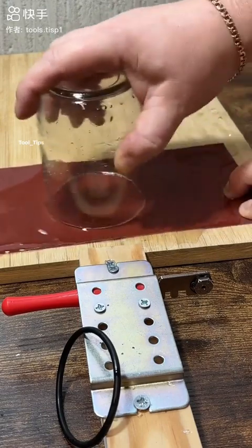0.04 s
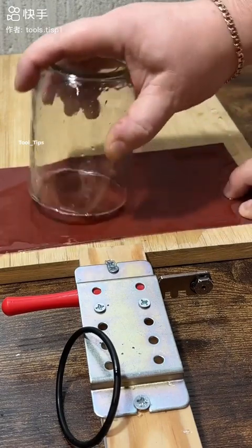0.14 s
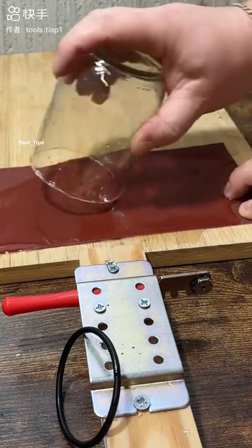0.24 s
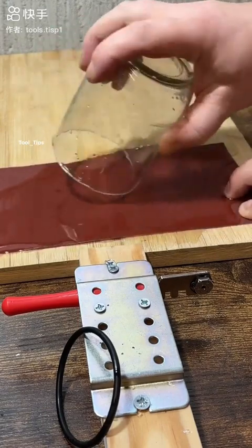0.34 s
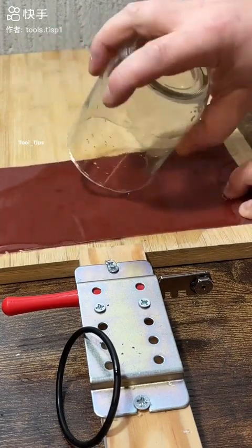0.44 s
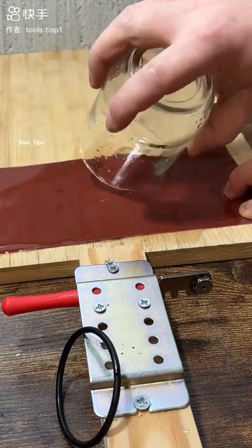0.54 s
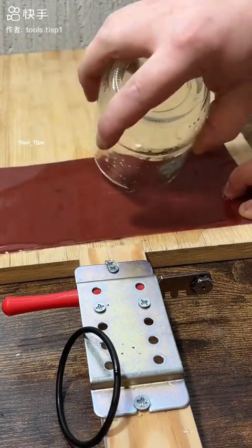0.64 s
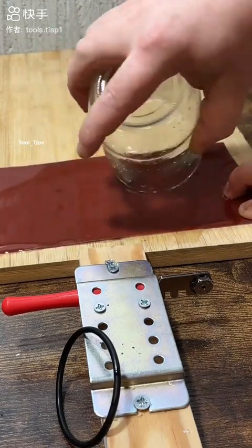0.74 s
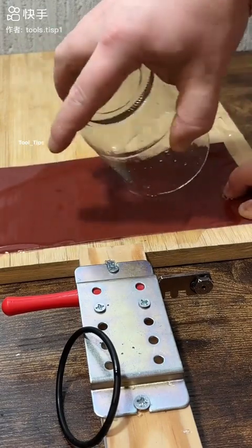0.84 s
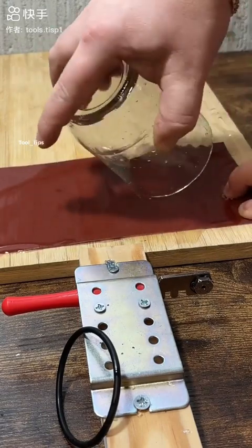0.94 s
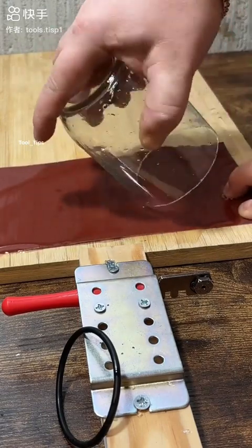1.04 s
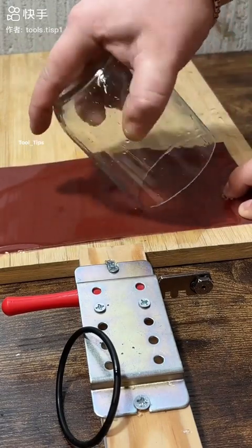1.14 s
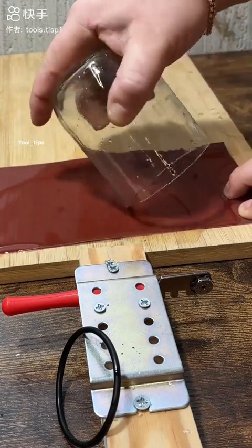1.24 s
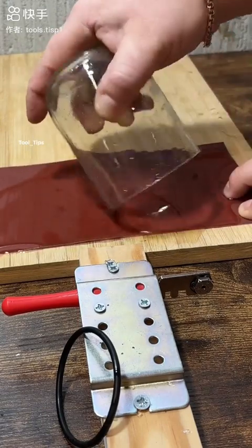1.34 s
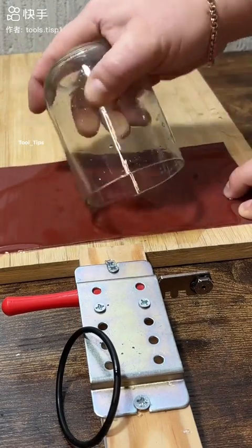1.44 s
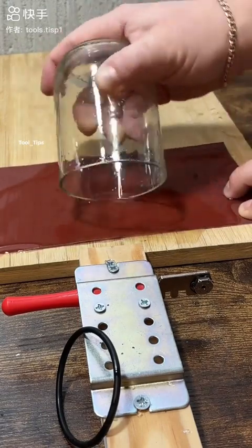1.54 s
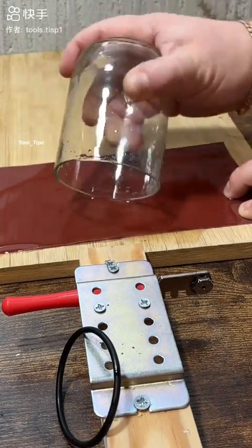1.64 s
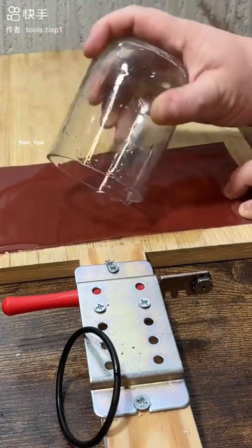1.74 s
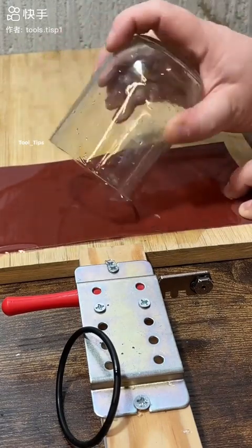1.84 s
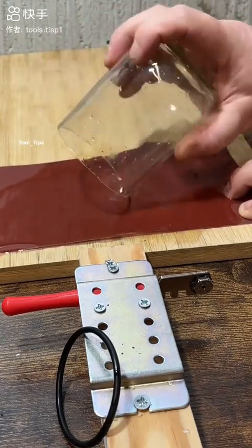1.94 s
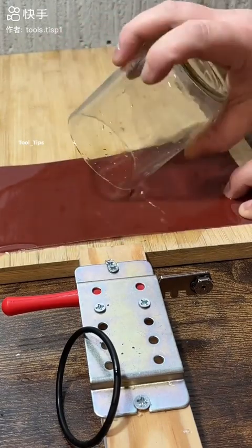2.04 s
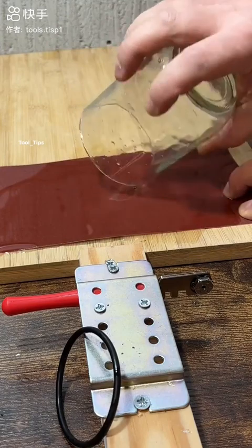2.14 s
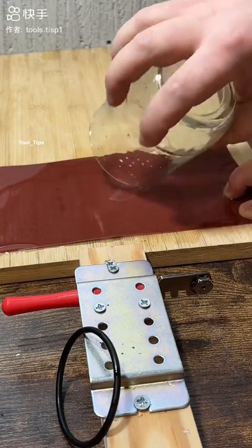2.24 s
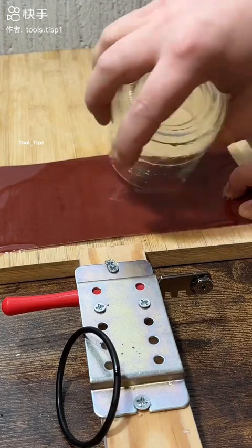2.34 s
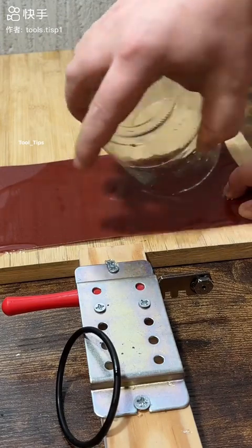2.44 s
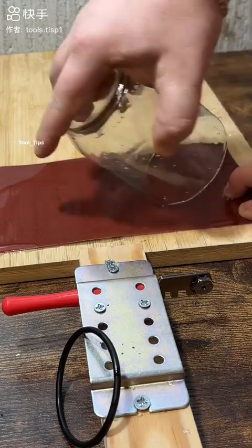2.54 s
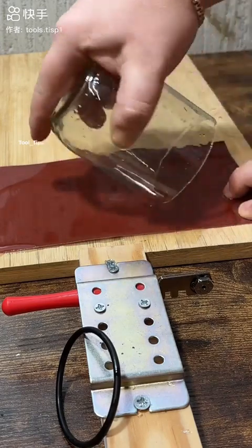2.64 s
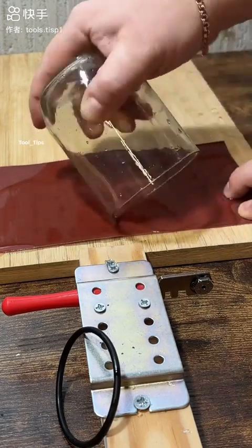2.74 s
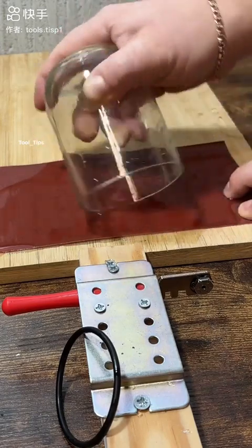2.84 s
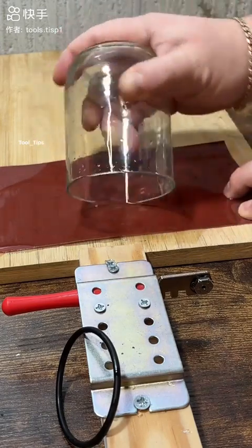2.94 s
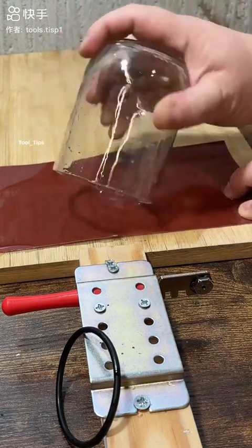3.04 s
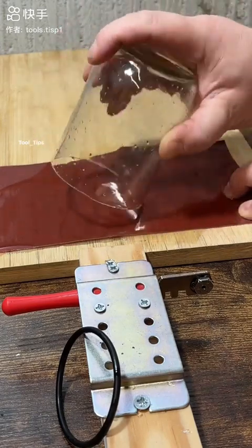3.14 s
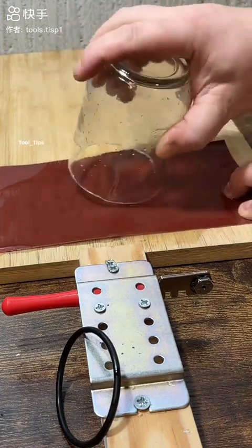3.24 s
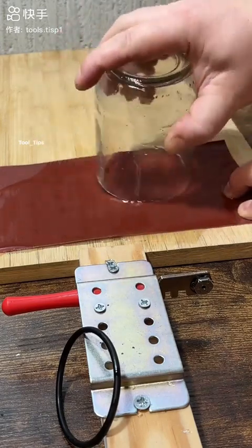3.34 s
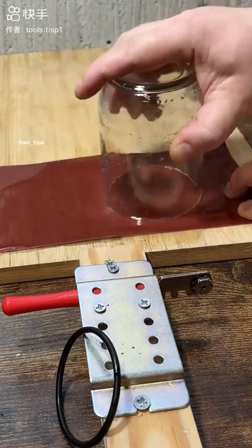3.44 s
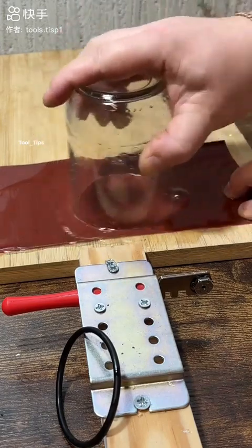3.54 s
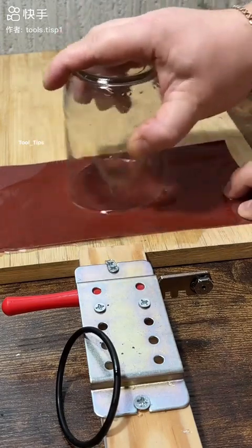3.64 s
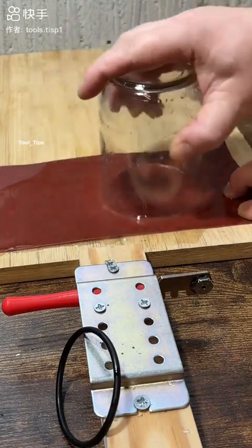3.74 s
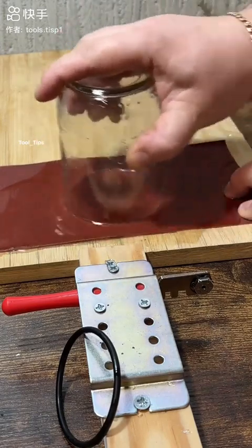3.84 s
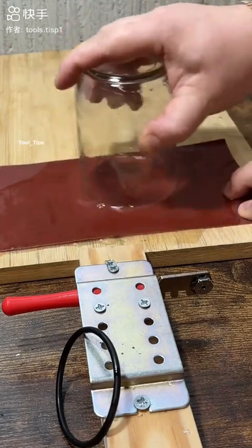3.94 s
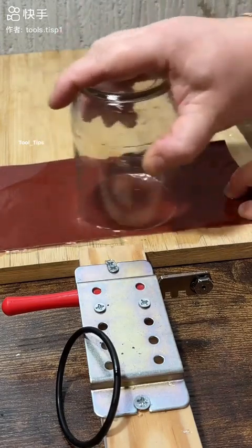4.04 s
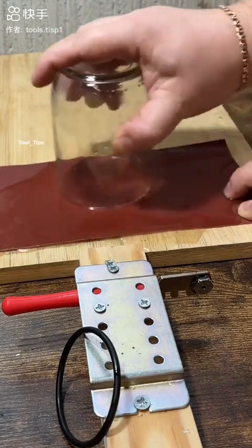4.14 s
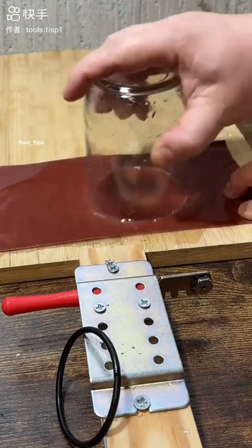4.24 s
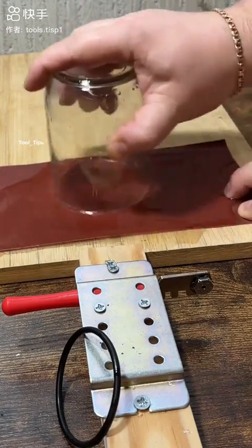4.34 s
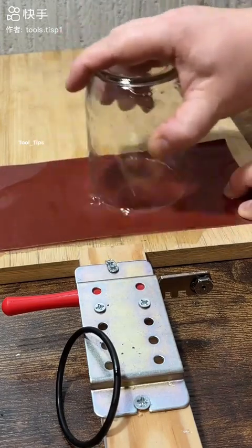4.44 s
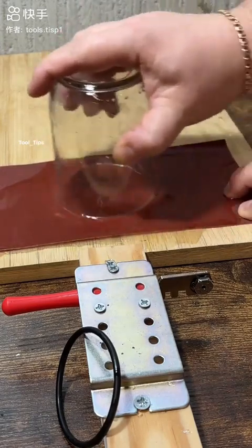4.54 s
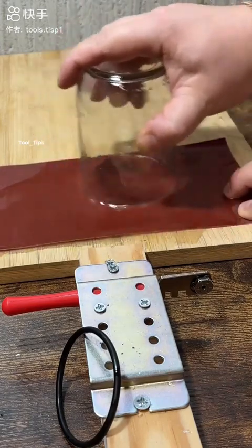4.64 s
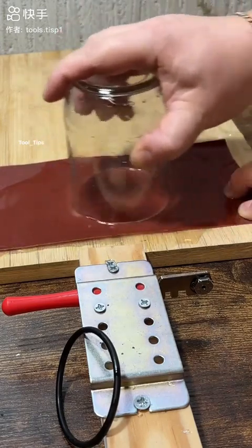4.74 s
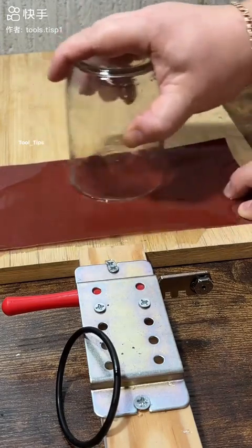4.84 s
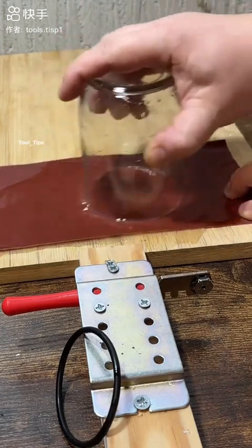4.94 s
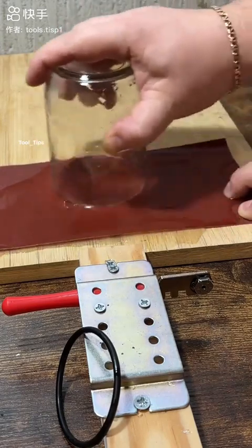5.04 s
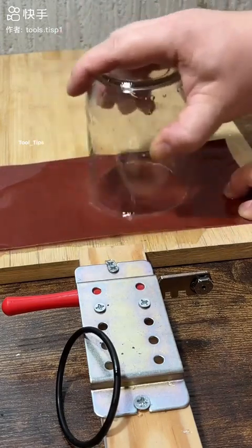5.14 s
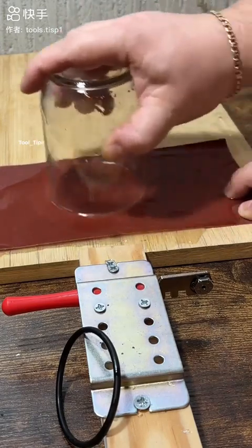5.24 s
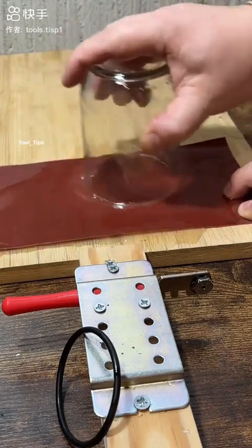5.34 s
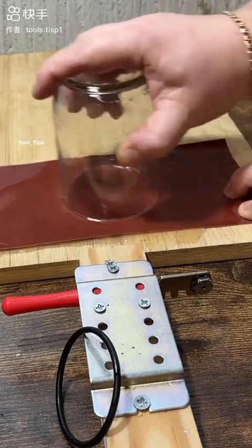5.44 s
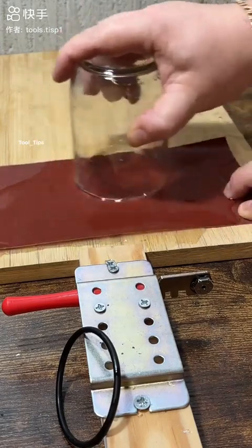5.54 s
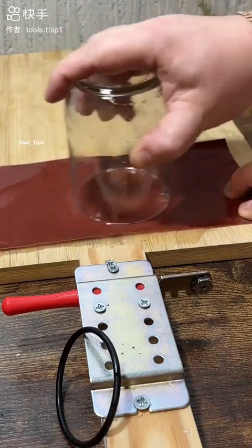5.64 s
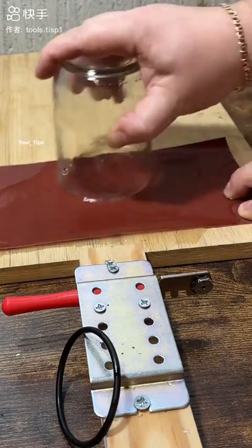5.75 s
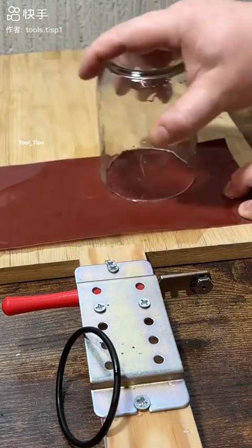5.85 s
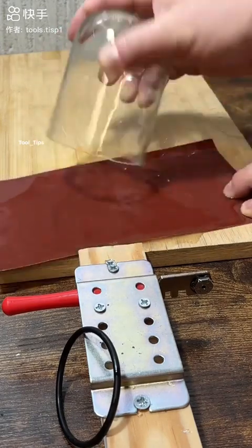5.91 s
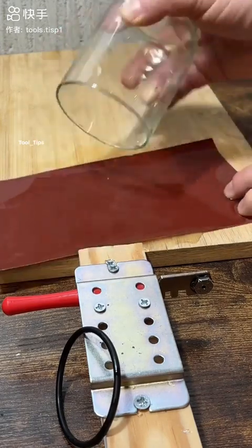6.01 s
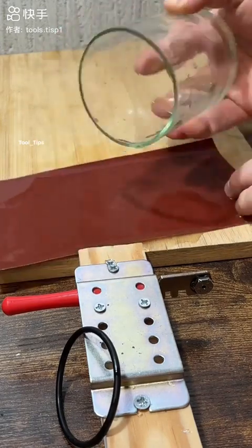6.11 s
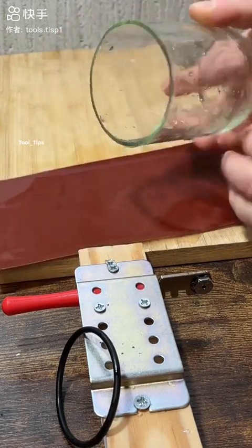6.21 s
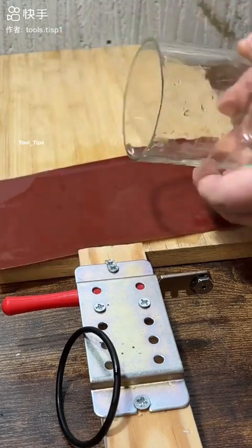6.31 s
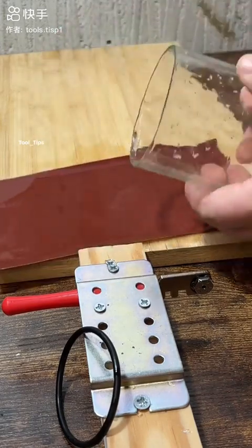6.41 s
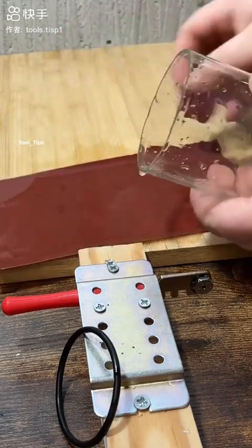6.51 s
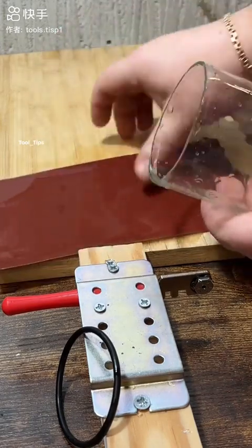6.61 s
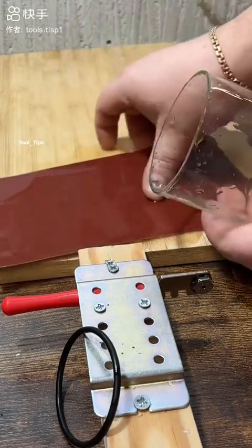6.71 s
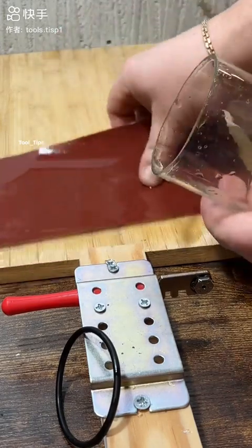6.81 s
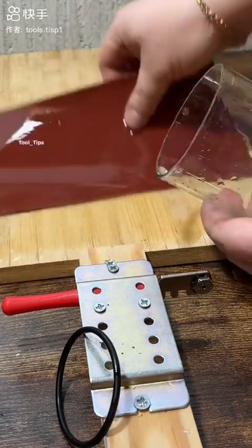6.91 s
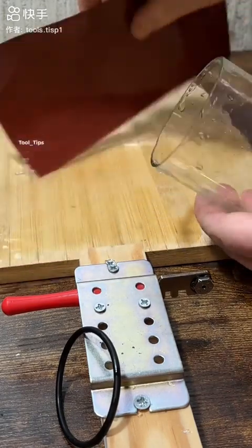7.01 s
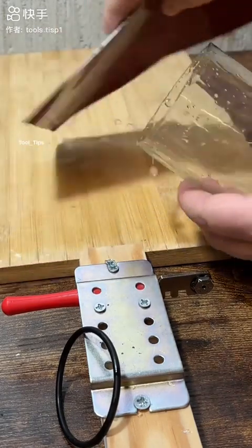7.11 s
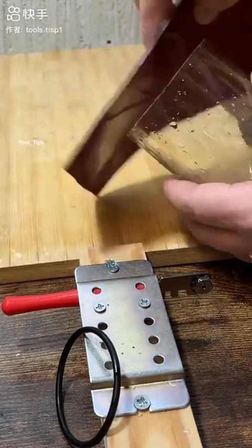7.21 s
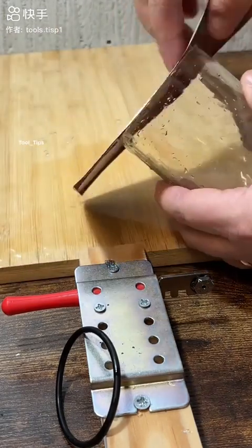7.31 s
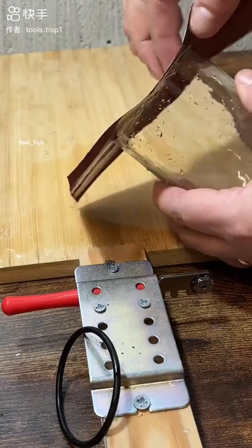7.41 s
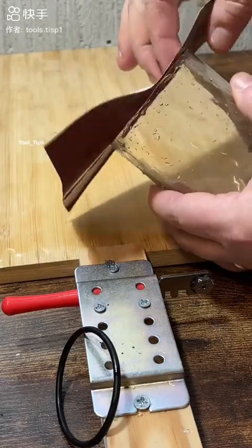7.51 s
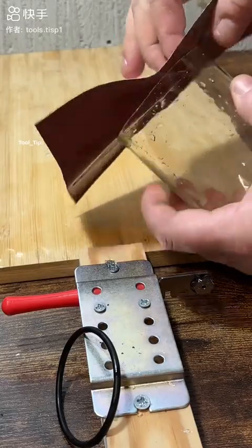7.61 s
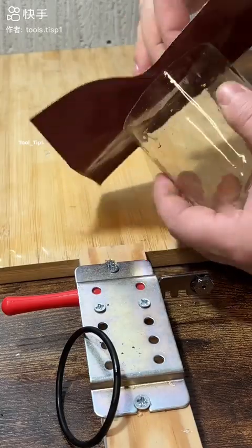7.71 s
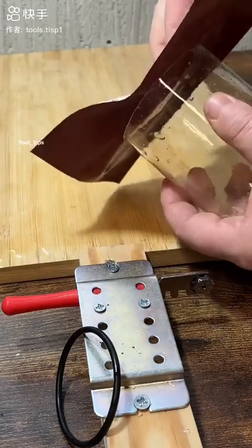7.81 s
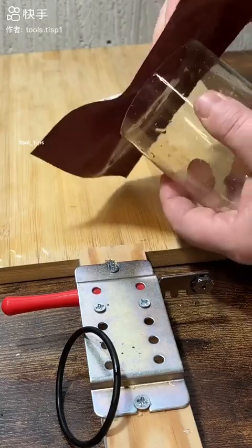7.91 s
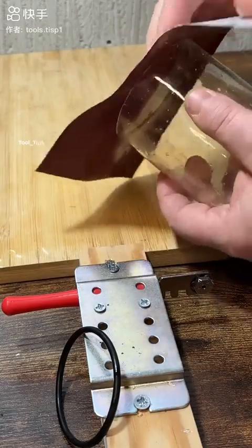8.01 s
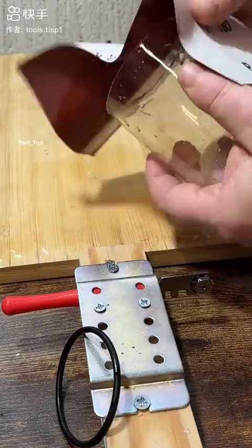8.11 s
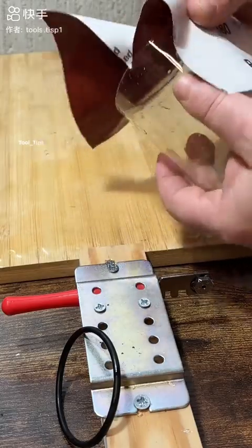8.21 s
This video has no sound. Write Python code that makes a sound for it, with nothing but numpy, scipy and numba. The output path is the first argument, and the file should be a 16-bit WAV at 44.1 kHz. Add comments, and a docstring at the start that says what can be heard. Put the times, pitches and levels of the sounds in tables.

```python
"""Grinding a jar rim on wet sandpaper

A glass jar's cut rim is ground over a wooden board, close by in a small workshop. Rolled on its tilted
edge, the jagged parts rasp; rubbed flat in quick circles, the glass sings and stick-slip makes it squeal.
The grit also shakes the board and the air in the jar. The jar is lifted, and the sheet is picked up
and wiped over the rim by hand."""
import sys
import numpy as np
from scipy import signal
from scipy.fft import rfft, irfft, next_fast_len
from scipy.io import wavfile
from scipy.ndimage import uniform_filter1d
from numba import njit

SR = 44100
rng = np.random.default_rng(int(sys.argv[2]) if len(sys.argv) > 2 else 0)


def int16_out(signal):
    """Quantize to a 16-bit WAV file."""
    q = np.round(np.clip(np.atleast_2d(signal).T, -1, 1) * 32767)
    wavfile.write(sys.argv[1], SR, q.astype(np.int16))


N = 364707

# jar wall bending modes (frequency [Hz], width [Hz], level [dB], rise at full tilt [ratio], grip [dB])
GLASS_MODES = [(1925, 45, -0.5, .04, 3), (5163, 36.6, -2, 0.017, 2.2), (5190, 58, -7.5, 0.02, 1.5),
               (8860, 260, -10.5, .01, 1.3), (9320, 200, -10.5, .01, 2.8)]
# board modes (frequency [Hz], t60 [s], level [dB])
BOARD_MODES = [(81, 0.17, -14.5), (159, 0.16, -12), (233, 0.088, -1.5), (297, 0.098, -4), (349, 0.059, 1),
               (377.5, 0.053, -8.5), (513, .06, -4.5), (604, 0.07, -11.5)]

TURN_S = 1.58  # one roll round the tilted edge
CIRCLE_S, CIRCLE_PEAK_S = 0.2269, 4.02  # flat circles: period, a fastest moment


def grinding():
    """Grit under the rim scrapes and shakes the glass, the air in the jar and the board."""
    # lean of the jar (time [s], tilt [0 flat, 1 on edge])
    lean = [(0, 0.062), (.065, 0.16), (.16, 0.47), (.6, 0.62), (1.4, 0.7), (2.2, 0.8), (2.95, 0.9),
            (3.17, 0.43), (3.32, .22), (3.365, 0.024), (5.8, 0.028), (5.86, 0.21)]
    # scrape spectrum (frequency [Hz], level [dB])
    scrape_spectrum = [(500, -18.5), (1100, -0.5), (1450, 2.5), (2500, 1.5), (3300, 0.5), (4450, 4.5),
                       (4800, -0.5), (5700, 2), (6350, -1), (6600, -6.5), (8450, -6), (8750, 0.5),
                       (10300, 0.5), (13000, 2.5), (16000, 0.5)]
    # resonances of the tilted jar (frequency [Hz], width [Hz], level [dB])
    jar_modes = [(1190, 200, 1.5), (1460, 260, 13.5), (2040, 200, 0), (3470, 150, -1.5), (3726, 66, -2),
                 (4460, 93, 16), (5370, 67, -25.5), (5700, 170, -29.5), (9460, 200, -1), (12600, 750, 3)]
    tilt = np.clip(curves(lean)[0], 0, 1)
    force = rim_force(tilt)
    board_db, wall_db, low_db, high_db = drives_db(tilt, force)
    grains = grit(rate_hz=14000, spread_db=2, judder_db=2.5, judder_hz=401.6)
    scrape = colour(grit(rate_hz=12000, spread_db=3, judder_db=1.46, judder_hz=503), scrape_spectrum)
    # on edge the jar is open below: the scrape turns hollow
    scrape -= tilt * (0.53 * resonate(scrape, 4730, 330) + 0.42 * resonate(scrape, 1720, 240))
    hollow = unit(sum(undb(db) * resonate(grains, hz, width_hz) for hz, width_hz, db in jar_modes))
    sound = undb(0.06 - 2 * tilt) * scrape + undb(-10) * tilt * hollow
    sound += wall_voice(grains, tilt, wall_db)
    sound += jar_air(grains, tilt)
    sound += undb(board_db) * board_rumble(tilt)
    return force * sound + glass_ring(force * grains, tilt, low_db, high_db)


def rim_force(tilt):
    """Steady pressure, swinging with each flat circle until the lift, plus rasps."""
    # rim pressure on the paper (time [s], level [dB])
    pressure = [(0, -43.5), (0.125, -66), (0.19, -54), (0.24, -33.5), (0.42, -40), (0.65, -41.5),
                (0.7, -56), (0.92, -68), (1.0, -58.5), (1.66, -57), (1.73, -33.5), (2.0, -33), (2.28, -37),
                (2.36, -47.5), (2.55, -53), (2.88, -44), (2.99, -32), (3.11, -34.3), (3.22, -39),
                (4.0, -35.2), (5.8, -35.5)]
    # jagged parts dragging through the grit (centre [s], length [s], level [dB])
    rasps = [(0.089, 0.072, -39.5), (0.159, 0.072, -36.5), (0.216, 0.039, -36.5), (0.723, 0.051, -43),
             (0.79, 0.05, -46.5), (0.872, 0.068, -48), (0.964, 0.073, -37), (1.056, 0.058, -39.5),
             (1.158, 0.048, -40), (1.223, 0.072, -38), (1.293, 0.059, -35.5), (1.355, 0.066, -34.5),
             (1.389, 0.016, -39), (1.415, 0.066, -34.5), (1.475, 0.058, -34.5), (1.539, 0.067, -35.5),
             (1.599, 0.094, -35.5), (1.676, 0.074, -29.5), (2.353, 0.035, -37), (2.409, 0.088, -36),
             (2.475, 0.05, -38.5), (2.609, 0.047, -40), (2.644, 0.048, -34.5), (2.705, 0.056, -32),
             (2.766, 0.056, -31), (2.83, 0.055, -30), (2.887, 0.042, -32.5), (3.155, 0.045, -37),
             (3.215, 0.035, -38), (5.858, 0.033, -40.5)]
    lift_s, lift_db_per_s = 5.8, 476
    circling_db = 2 * (1 - on_edge(tilt)) * cycle(CIRCLE_S, CIRCLE_PEAK_S)
    lift_db = lift_db_per_s * np.clip(clock() - lift_s, 0, 1)
    return effort(curves(pressure)[0] + circling_db - lift_db, rasps, skew=0.88, bite=1.36)


def drives_db(tilt, force):
    """Drive of the board, the wall's broad voice, and the low and high glass modes."""
    firm_db, touch_s = -35.5, 0.19
    edge = on_edge(tilt)
    flat = 1 - edge
    circle = cycle(CIRCLE_S, CIRCLE_PEAK_S)
    board_db = -11.5 * edge + flat * (-14.5 - 2 * circle)
    board_db += 3 * np.sin(np.pi * edge)  # half tilted, an arc of the rim digs in
    # on edge, the contact point passes each mode's antinode in turn
    wall_db = -7.5 + edge * 3 * cycle(TURN_S, peak_s=1.38)
    low_db = edge * (-7 + 4 * cycle(TURN_S, peak_s=0.64)) + flat * (-5.5 - 1.5 * circle)
    high_db = edge * (-6 + 5.5 * cycle(TURN_S, peak_s=1.03)) + flat * (-3 + 2.5 * circle)
    # a light touch damps less, so more rings
    touch_power = uniform_filter1d(force ** 2, int(touch_s * SR))
    touch_db = 10 * np.log10(np.maximum(touch_power, 1e-12))
    light_db = np.minimum(firm_db - touch_db, 16)
    return (board_db + 0.54 * light_db, wall_db + 0.25 * light_db,
            low_db + 0.46 * light_db, high_db + 0.14 * light_db)


def glass_ring(push, tilt, low_db, high_db):
    """The wall rings after each push, higher and more damped on edge."""
    out = np.zeros(N)
    for hz, width_hz, db, rise, grip_db in GLASS_MODES:
        coupling_db = low_db if hz == GLASS_MODES[0][0] else high_db
        pitch_hz = hz * (1 + rise * tilt ** 2 + 0.0044 * walk(40))
        damping_hz = width_hz * (1 + 1.1 * tilt ** 2)
        grip = unit(undb(grip_db * walk(45)))  # the rim bites and slides by turns
        gain = undb(coupling_db + db - 1.505 * tilt) * np.sqrt(SR / (np.pi * damping_hz))
        out += resonate(push * grip * gain, pitch_hz, damping_hz)
    return out


def wall_voice(grains, tilt, wall_db):
    """The wall's broad resonance sinks once a turn while a lower one comes forward."""
    sag = on_edge(tilt) * ((1 + cycle(TURN_S, peak_s=0.8)) / 2) ** 2
    upper = band(grains, hz=3312 - 650 * sag, width_hz=680)
    lower = band(grains, hz=2190, width_hz=330)
    return undb(wall_db) * upper + undb(-8.5) * sag * lower


def jar_air(grains, tilt):
    """The air in the jar rings higher as the gap under the rim opens, loudest at a narrow gap."""
    shut_hz, open_hz, loudest_tilt = 380, 1142, 0.24
    hz = open_hz - (open_hz - shut_hz) * np.exp(-tilt / 0.3)
    leak_hz = 115 + 170 * tilt ** 2  # a wider gap damps more
    ring = band(grains / np.sqrt(leak_hz), hz, leak_hz)
    gap = tilt / loudest_tilt
    return undb(-2) * (gap * np.exp(1 - gap)) ** 1.66 * ring


def board_rumble(tilt):
    """The board rumbles under the grit; its lowest mode drones when the rim lies flat."""
    # rumble spectrum (frequency [Hz], level [dB])
    spectrum = [(35, -24.5), (70, -12.5), (105, -8.5), (150, -7), (240, 4), (370, 0), (560, 5), (850, 0.5),
                (1300, -0.5), (2600, -28)]
    shake = grit(rate_hz=5000, spread_db=5, judder_db=0.5, judder_hz=119.4)
    modes = sum(undb(db) * np.sqrt(t60_s) * resonate(shake, hz, np.log(1000) / np.pi / t60_s)
                for hz, t60_s, db in BOARD_MODES[1:])
    drone = unit(resonate(rng.standard_normal(N), BOARD_MODES[0][0], width_hz=18))
    rumble = colour(grit(rate_hz=5000, spread_db=1.5, judder_db=2, judder_hz=101.6), spectrum)
    return undb(-3.5) * unit(modes) + undb(-2.5) * rumble + undb(-15.5) * (1 - tilt) * drone


def squeals():
    """Stick-slip locks onto one wall mode, swells to a near-pure tone and lets go."""
    # squeals (centre [s], length [s], mode [low/high], level [dB])
    locks = [(0.211, 0.033, "low", -34), (0.324, .04, "low", -35), (3.283, 0.055, "low", -34),
             (3.345, .099, "high", -32.5), (3.75, 0.083, "high", -37), (3.86, 0.066, "low", -35),
             (3.996, .04, "low", -33), (4.017, 0.055, "high", -29), (4.094, 0.056, "low", -31),
             (4.234, 0.093, "high", -28), (4.334, 0.04, "low", -32), (4.456, .039, "low", -17.5),
             (4.481, .06, "high", -28), (4.927, 0.056, "high", -26), (5.142, .04, "low", -31),
             (5.166, 0.14, "high", -34), (5.371, 0.034, "low", -14), (5.38, 0.12, "high", -38),
             (5.613, 0.049, "high", -28.5), (5.747, 0.031, "low", -31)]
    mode_hz = {"low": 1918.4, "high": 5190}
    waver = 2 * np.pi * np.cumsum(0.00407 * walk(150)) / SR
    tones = {mode: np.sqrt(2) * np.sin(hz * (2 * np.pi * clock() + waver))
             for mode, hz in mode_hz.items()}
    return sum(undb(db) * swell(centre_s, length_s, skew=1, bite=1.1) * tones[mode]
               for centre_s, length_s, mode, db in locks)


def bumps():
    """Soft knocks of jar and hand ring the board."""
    # knocks (time [s], peak level [dB])
    knocks = [(3.6, -39.5), (3.996, -43.5), (4.3, -47), (4.447, -35), (4.476, -37), (4.586, -32.5),
              (4.601, -51.5), (4.765, -41), (5.152, -37), (5.796, -32), (5.812, -64), (6.62, -58)]
    t = np.arange(SR // 2) / SR
    ring = sum(undb(db - 60 * t / t60_s) * np.sin(2 * np.pi * hz * t) for hz, t60_s, db in BOARD_MODES)
    ring *= 1 - np.exp(-t / 0.0036)  # each knock builds up over a few milliseconds, light in the deepest bass
    ring /= np.abs(ring).max()
    out = np.zeros(N)
    for time_s, db in knocks:
        start = int(time_s * SR)
        out[start:start + len(t)] += undb(db) * ring
    return out


def wiping():
    """The sheet scrapes the jar's mouth: air and glass ring, wrapped paper rasps like a membrane."""
    # sheet pressure on the rim (time [s], level [dB])
    pressure = [(7.165, -81), (7.19, -47.5), (7.34, -58), (7.41, -48.5), (7.62, -46.5), (7.85, -60.5),
                (8.0, -48.5), (8.07, -24), (8.235, -29.5), (8.268, -46)]
    # short wipes (centre [s], length [s], level [dB])
    wipes = [(7.185, 0.022, -44.5), (7.235, 0.057, -41.5), (7.298, 0.069, -47.5), (7.381, 0.041, -34.5),
             (7.49, 0.041, -30.5), (7.536, 0.09, -31.5), (7.581, 0.034, -38.5), (7.627, 0.054, -32.5),
             (7.753, 0.088, -47.5), (7.835, 0.022, -49.5), (7.908, 0.041, -43.5), (7.942, 0.048, -38.5)]
    # sheet over the mouth (time [s], air resonance [Hz], wrap round the rim [0-1])
    cover = [(7.17, 674, 0.03), (7.5, 555, 0.12), (7.75, 500, 0.4), (7.84, 520, 1), (7.95, 567, 0.04),
             (8.06, 650, 0.95), (8.13, 787, 0.97)]
    # spectra of loose and wrapped paper (frequency [Hz], level [dB])
    loose_spectrum = [(100, -13), (300, -4.5), (500, 9.5), (900, 7.5), (1200, 1), (1450, 4), (2000, 0.5),
                      (3100, -0.5), (5500, -4.5), (6800, -5), (8400, -9.5), (9200, -3), (11000, -1.5),
                      (16000, 1)]
    wrapped_spectrum = [(59, -71), (100, -56), (109, -52), (209, -42), (243, -38), (564, -27), (774, -5),
                        (1210, -23.5), (1520, -19.5), (2990, -11.5), (3460, -7.5), (6120, -14.5),
                        (6660, -21), (8770, -18), (15500, -26)]
    force = effort(curves(pressure)[0], wipes, skew=0.93, bite=1.3)
    air_hz, wrap = curves(cover)
    grains = grit(rate_hz=7000, spread_db=1.5, judder_db=1.5, judder_hz=345)
    slips = chatter() * grit(rate_hz=12000, spread_db=2, judder_db=2.2, judder_hz=351.4)
    paper = np.sqrt(1 - wrap) * colour(grains, loose_spectrum)
    paper += np.sqrt(wrap) * undb(-0.8) * colour(slips, wrapped_spectrum)
    air = undb(-13 - 1.5 * wrap) * band(grains, air_hz, width_hz=95)
    # soft paper stirs only the upper wall modes
    rim = undb(1.5) * sum(resonate(force * grains, hz, width_hz) for hz, width_hz, *_ in GLASS_MODES[1:])
    return force * (paper + air) + (1 - wrap) * rim


def chatter():
    """Stick-slip envelope of the wrapped sheet: each slip starts hard and dies away."""
    slip_hz, rest_depth, peak_depth = 86.2, 0.12, 0.85
    phase = np.cumsum(slip_hz * (1 + 0.22 * walk(60))) / SR % 1
    burst = swell(centre_s=8.2, length_s=0.13, skew=1, bite=2)
    depth = rest_depth + (peak_depth - rest_depth) * burst
    return np.sqrt(1 - depth + depth * unit(np.exp(-phase / 0.41)) ** 2)


def sheet_handling():
    """The stiff sheet slides off the board and flicks as it bends."""
    # pulls (centre [s], length [s], level [dB])
    pulls = [(6.655, .14, -65.5), (6.815, 0.3, -59), (6.985, 0.19, -60)]
    # sliding paper spectrum (frequency [Hz], level [dB])
    spectrum = [(59, -62), (100, -10), (319, -12), (394, -10.5), (1040, -12.5), (1230, -14), (1520, -4),
                (1760, -15), (3610, -1.5), (4020, -8), (15500, -21)]
    # flicks (time [s], level [dB], brightness [Hz])
    flicks = [(6.703, -54, 9000), (6.96, -40, 1310), (6.97, -43, 1600), (7.08, -52.5, 1360),
              (7.176, -40, 5960), (7.77, -34, 6980), (7.892, -43.5, 6000), (7.939, -39, 9000)]
    grains = grit(rate_hz=2800, spread_db=1, judder_db=1.7, judder_hz=150.7)
    out = effort(-91, pulls, skew=0.93, bite=1.2) * colour(grains, spectrum)
    for time_s, db, bright_hz in flicks:
        age_s = clock() - time_s
        centre_hz = np.sqrt(600 * bright_hz)  # a sharper flick is higher and broader
        crack = resonate(rng.standard_normal(N), centre_hz, 1.2 * bright_hz)
        crack = unit(resonate(crack, centre_hz, 1.06 * bright_hz))
        out += undb(db) * crack * (age_s > 0) * np.exp(-np.abs(age_s) / 0.0059)
    return out


def workshop(x, t60_s, wet_db):
    """Adds a short diffuse tail from the bench and nearby walls."""
    t = np.arange(SR // 2) / SR
    tail = rng.standard_normal(len(t)) * np.exp(-np.log(1000) * t / t60_s) * (t > 0.003)
    tail = signal.sosfilt(signal.butter(1, 6000, fs=SR, output="sos"), tail)
    return x + undb(wet_db) * signal.fftconvolve(x, tail / np.linalg.norm(tail))[:N]


def room_tone():
    """Faint low noise of the still room."""
    # room spectrum (frequency [Hz], level [dB])
    spectrum = [(12, -25.5), (20, 1), (38, -12.5), (53, -15.5), (80, -7), (103, -15.5), (225, -17),
                (404, -21.5), (614, -23.5), (881, -27.5), (15500, -38)]
    return undb(-68.5) * colour(rng.standard_normal(N), spectrum)


def grit(rate_hz, spread_db, judder_db, judder_hz):
    """Abrasive grains catch and let go: dense, uneven clicks in clusters; rms 1."""
    hits = rng.random(N) < rate_hz / SR
    sizes = undb(spread_db * np.minimum(rng.exponential(size=N), 5))
    return unit(hits * sizes * rng.choice([-1, 1], N) * undb(judder_db * walk(judder_hz)))


def effort(steady_db, strokes, skew, bite):
    """Rubbing strength: steady part and strokes, summed in power."""
    stroke_power = sum((undb(db) * swell(centre_s, length_s, skew, bite)) ** 2
                       for centre_s, length_s, db in strokes)
    return np.sqrt(undb(steady_db) ** 2 + stroke_power)


def swell(centre_s, length_s, skew, bite):
    """One rise and fall; skew < 1 speeds the rise, bite steepens the flanks."""
    progress = (clock() - centre_s) / length_s + 0.5
    inside = (progress > 0) & (progress < 1)
    out = np.zeros(N)
    out[inside] = np.tanh(bite * np.sin(np.pi * progress[inside] ** skew) ** 2.5) / np.tanh(bite)
    return out


def on_edge(tilt):
    """0 with the whole rim down, 1 with a single point touching."""
    return np.clip(tilt / 0.62, 0, 1)


def cycle(period_s, peak_s):
    """Steady round of the hand, +1 at peak_s."""
    return np.cos(2 * np.pi * (clock() - peak_s) / period_s)


def walk(rate_hz):
    """Smooth random drift; rms 1."""
    hold = max(int(SR / rate_hz), 2)
    steps = np.repeat(rng.standard_normal(N // hold + 1), hold)
    return unit(uniform_filter1d(steps, hold)[:N])


def colour(x, spectrum):
    """Minimum-phase filter through (frequency [Hz], level [dB]) points; rms 1."""
    hz, db = np.transpose(spectrum)
    size = next_fast_len(N + 8192)
    size += size % 2
    bins_hz = np.arange(size // 2 + 1) * SR / size
    gain = undb(np.interp(np.log(bins_hz + 1), np.log(hz), db))
    cepstrum = irfft(np.log(gain))
    cepstrum[1:size // 2] *= 2
    cepstrum[size // 2 + 1:] = 0
    return unit(irfft(rfft(x, size) * np.exp(rfft(cepstrum)))[:N])


@njit
def svf(x, hz, width_hz):
    """State-variable band-pass, centre and width per sample."""
    y = np.empty(len(x))
    band_state, low_state = 0., 0.
    for i in range(len(x)):
        g, k = np.tan(np.pi * hz[i] / SR), width_hz[i] / hz[i]
        v = (band_state + g * (x[i] - low_state)) / (1 + g * (g + k))
        band_state = 2 * v - band_state
        low_state += 2 * g * v
        y[i] = k * v
    return y


def resonate(x, hz, width_hz):
    """One resonance, gain 1 at its centre."""
    return svf(x, hz + np.zeros(N), width_hz + np.zeros(N))


def band(x, hz, width_hz):
    """Two equal resonances in series; rms 1."""
    return unit(resonate(resonate(x, hz, width_hz), hz, width_hz))


def curves(table):
    """Each value column, interpolated linearly over time."""
    times_s, *columns = np.transpose(table)
    return [np.interp(clock(), times_s, column) for column in columns]


def clock():
    """Sample times [s]."""
    return np.arange(N) / SR


def undb(db):
    """Decibels to gain."""
    return 10 ** (np.asarray(db) / 20)


def unit(x):
    """Scale to rms 1."""
    return x / np.sqrt(np.mean(x ** 2))


def scene():
    """Jar, board and sheet in the workshop, over room tone; mono."""
    near = grinding() + squeals() + bumps() + sheet_handling() + wiping()
    return (room_tone() + workshop(near, t60_s=0.14, wet_db=-12.5))[None]


def record(dry):
    """Steep low-pass at 15.6 kHz."""
    return signal.sosfilt(signal.ellip(12, 0.1, 80, 15600, fs=SR, output="sos"), dry)


dry = scene()
out = record(dry)
int16_out(out)
```